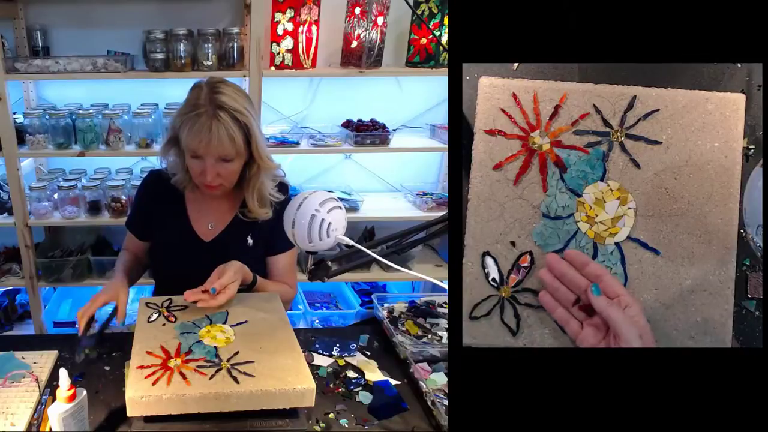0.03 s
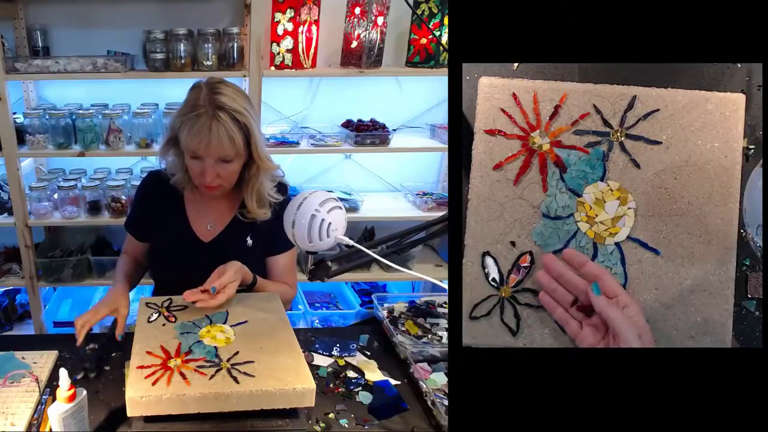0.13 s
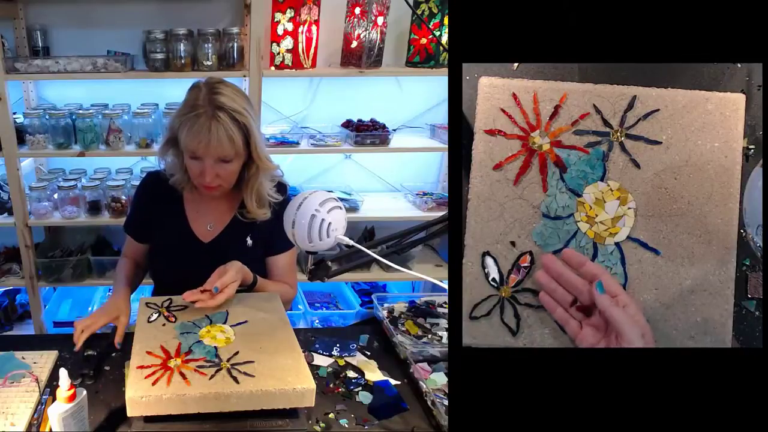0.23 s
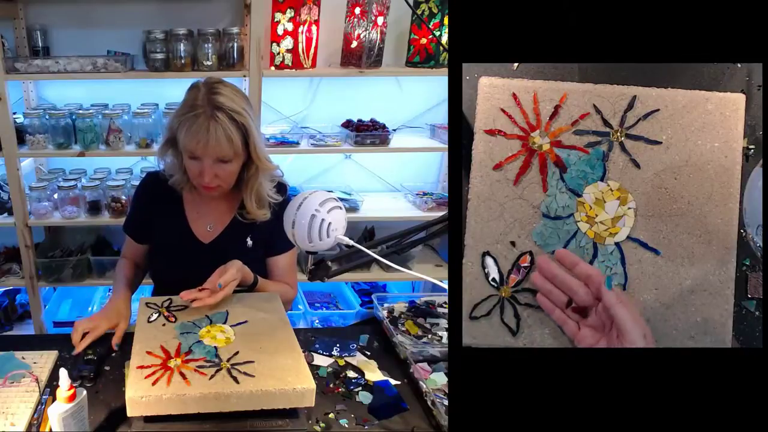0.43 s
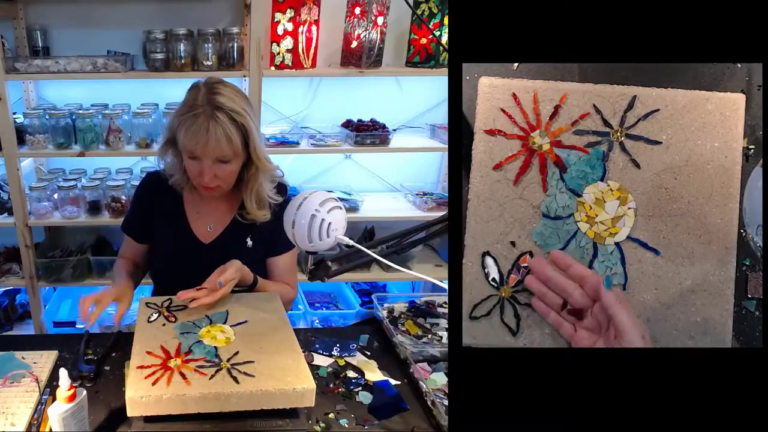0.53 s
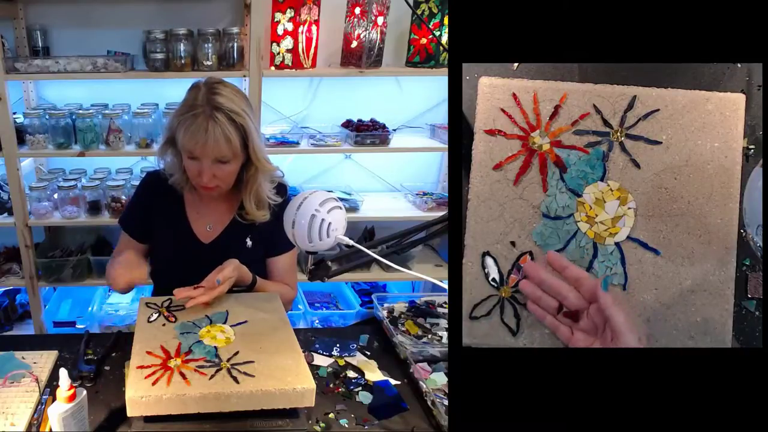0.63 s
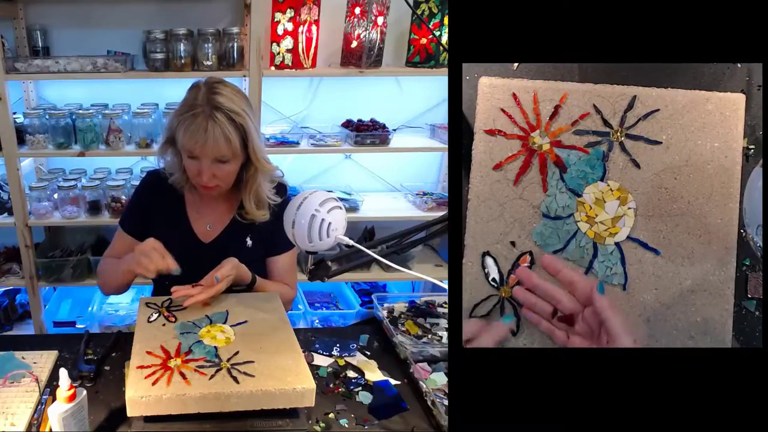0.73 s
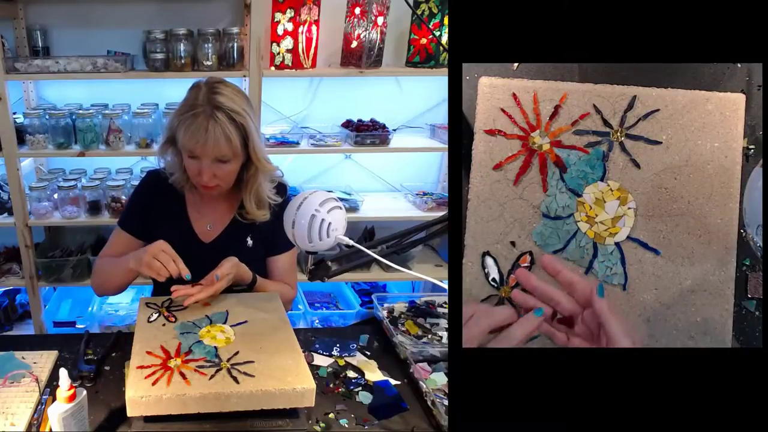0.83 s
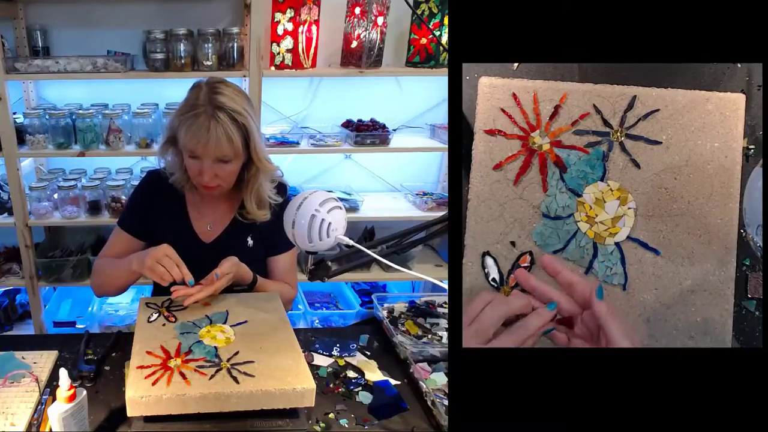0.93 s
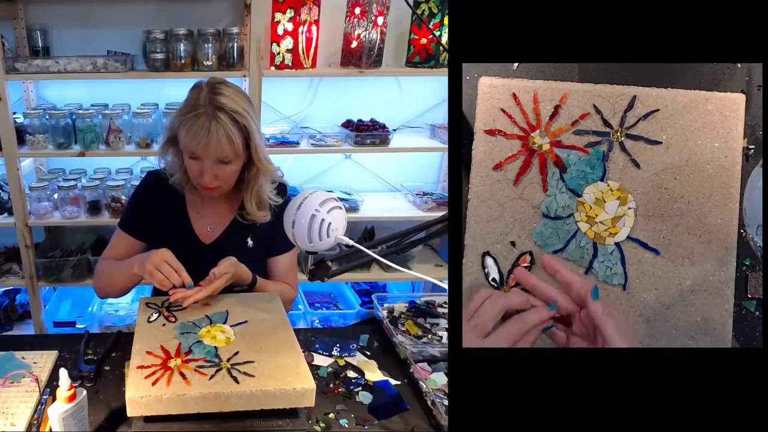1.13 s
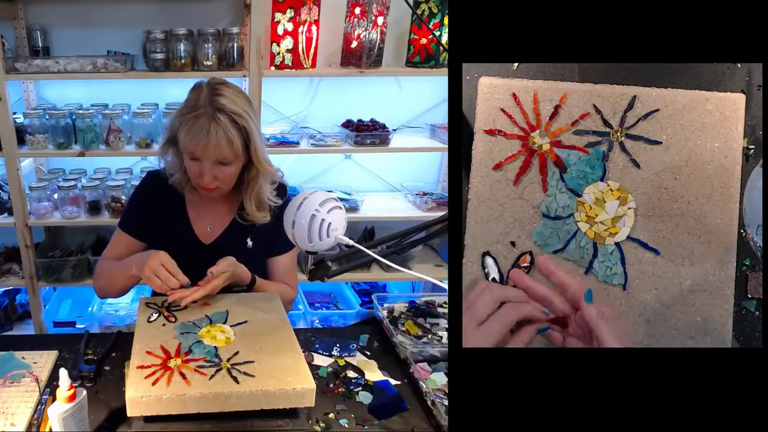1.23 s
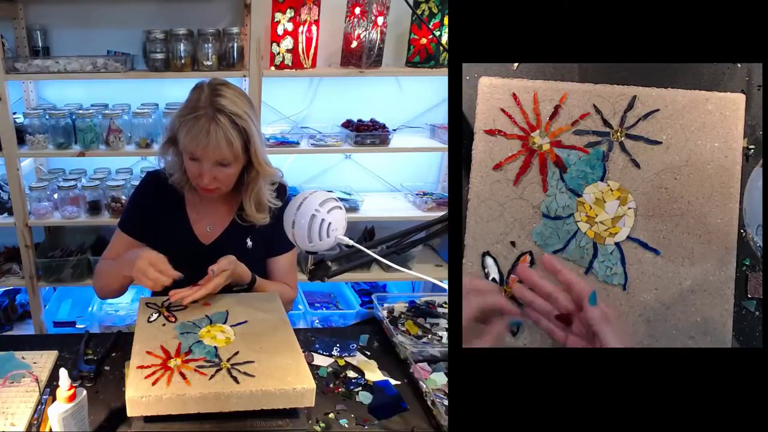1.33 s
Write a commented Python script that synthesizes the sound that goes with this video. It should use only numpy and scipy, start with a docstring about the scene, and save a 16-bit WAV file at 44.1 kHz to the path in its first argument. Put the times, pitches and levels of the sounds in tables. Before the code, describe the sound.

One sharp knock of a small hard tool on a work table, with brief glassy ring.

```python
"""A small hard tool knocks once on a cluttered work table, with a sharp crack and a brief glassy ring.
It first brushes the top with a soft thud and a slide; then its edge lands and strikes the board's modes.
The table sways deeply and loose things shiver with it until a hand stills it.
Fingers rub, small pieces tick and tap faintly, and the knock dies away in the quiet room."""
import sys
import numpy as np
from scipy import signal
from scipy.fft import rfft, irfft, next_fast_len
from scipy.io import wavfile

SR = 44100
rng = np.random.default_rng(int(sys.argv[2]) if len(sys.argv) > 2 else 0)


def inscribe(sig):
    """Save sig as 16-bit PCM at rate SR to the path in sys.argv[1].

    A 1-D sig is mono; a 2-D sig holds one channel per row.
    Samples are clipped to [-1, 1] before scaling.
    """
    pcm = np.round(np.clip(np.atleast_2d(sig).T, -1, 1) * 32767)
    wavfile.write(sys.argv[1], SR, pcm.astype(np.int16))


N = 61739
T = np.arange(N) / SR
CRACK_S, CRACK_RISE_S = 0.3982, 0.0005  # the tool's hard edge lands
TOP_BUILD_S = 0.00093  # a blow takes this long to spread through the board
ECHO_RISE_S = 0.013


def from_db(db):
    """Decibels to gain."""
    return 10 ** (np.asarray(db) / 20)


def rms_one(x):
    """Scale to rms 1."""
    return x / np.sqrt(np.mean(x ** 2) + 1e-20)


def envelope(start, rise, hold, t60):
    """Linear attack, hold counted from the start, exponential release; all in seconds."""
    return np.clip((T - start) / rise, 0, 1) * from_db(-60 * np.maximum(T - start - hold, 0) / t60)


def ring(start, hz, t60):
    """A decaying mode of height 1, struck at start."""
    age = np.maximum(T - start, 0)
    return np.sin(2 * np.pi * hz * age) * from_db(-60 * age / t60)


def noise(colour, skirt_db_per_octave=37.5):
    """Steady noise of the given colour, rolling off steeply outside its range; rms 1."""
    size = next_fast_len(N)
    hz = np.maximum(np.fft.rfftfreq(size, 1 / SR), 1)
    points_hz, points_db = np.transpose(colour)
    octaves_outside = np.abs(np.log2(hz / np.clip(hz, points_hz[0], points_hz[-1])))
    db = np.interp(np.log(hz), np.log(points_hz), points_db) - skirt_db_per_octave * octaves_outside
    return rms_one(irfft(rfft(rng.standard_normal(size)) * from_db(db), size)[:N])


def resonant_noise(hz, width_hz):
    """Pitched noise: two passes through one resonance; rms 1."""
    b, a = signal.iirpeak(hz, hz / (2 * width_hz), fs=SR)
    return rms_one(signal.lfilter(b, a, signal.lfilter(b, a, rng.standard_normal(N))))


def room_tone():
    """A faint, steady bed of dark noise."""
    # room tone colour: (frequency [Hz], relative level [dB])
    colour = [(30, -0.5), (90, -14), (220, -9), (650, -15), (1200, -18.5), (2000, -31.5), (4000, -45.5),
              (14000, -49)]
    return from_db(-72) * noise(colour)


def small_pieces(rise_s=0.0047):
    """Small pieces touch softly, one note each: taps stop short, glass rings on."""
    # faint taps: (time [s], level [dB], pitch [Hz])
    taps = [(1.300, -51, 1222), (1.307, -47.5, 626), (1.328, -53, 649), (1.335, -49.5, 45),
            (1.387, -56, 244)]
    # glass ticks: (time [s], level [dB], pitch [Hz])
    ticks = [(0.735, -79, 2800), (0.868, -69.5, 1963), (0.948, -74.5, 1990), (1.008, -85.5, 4040),
             (1.19, -79.5, 2050)]
    return sum(from_db(db) * envelope(s, rise_s, rise_s, t60) * np.sin(2 * np.pi * hz * (T - s))
               for touches, t60 in [(taps, 0.041), (ticks, 0.22)] for s, db, hz in touches)


def rubs():
    """Fingers and pieces rub the board: soft swells of pitched friction, each with a low bump."""
    # strokes: (peak time [s], length [s], rub level [dB], pitch [Hz], bump level [dB])
    strokes = [(0.028, 0.055, -74, 694, -64), (0.299, 0.039, -61.5, 1263, -47.5),
               (0.382, 0.049, -54, 1273, -37.5), (0.805, 0.045, -56.5, 601, -54.5),
               (0.801, 0.079, -67.5, 1041, -55), (0.874, 0.046, -53, 427, -53),
               (0.883, 0.023, -61.5, 1190, -50.5), (0.931, 0.044, -64, 798, -48),
               (1.056, 0.041, -60, 529, -68), (1.086, 0.028, -57.5, 758, -49),
               (1.149, 0.055, -64, 713, -49.5), (1.217, 0.032, -68, 1298, -66),
               (1.268, 0.04, -64.5, 1121, -76)]
    # broad friction colour: (frequency [Hz], relative level [dB])
    friction_colour = [(330, -14), (440, -2), (610, 6), (780, -4.5), (880, -7.5), (1100, -1.5), (1340, -8),
                       (1420, -15.5), (1650, -27), (1970, -19.5), (2200, -35), (4000, -41)]
    # low bump through the board: (frequency [Hz], relative level [dB])
    bump_colour = [(55, 6.5), (72, 1), (95, -11.5), (160, -10.5), (230, -5), (310, -25)]
    friction = from_db(-4.5) * noise(friction_colour)
    bump = noise(bump_colour)
    rubbing = np.zeros(N)
    for s, length, db, hz, bump_db in strokes:
        swell = np.exp(-2 * ((T - s) / length) ** 2)
        scrape = friction + resonant_noise(hz, width_hz=32)
        rubbing += swell * (from_db(db) * scrape + from_db(bump_db) * bump)
    return rubbing


def room_echo(start_s=0.396):
    """The knock's tail dies away in the room band by band, the treble first."""
    # tail colour: (frequency [Hz], relative level [dB])
    colour = [(80, -12.5), (130, -2), (260, 2.5), (400, -3.5), (600, -2.5), (760, -0.5), (1030, 2),
              (1340, -4.5), (1420, -7), (1600, -15), (2250, -23.5), (2800, -24), (4500, -27), (8000, -37),
              (13000, -48.5)]
    # room decay: (band centre [Hz], t60 [s])
    decays = [(100, 0.63), (260, 0.43), (700, 0.44), (1200, 0.37), (2000, 0.42), (4800, 0.33), (8000, 0.32),
              (13000, 0.089)]
    centres, t60s = np.transpose(decays)
    size = next_fast_len(N)
    diffuse = rfft(noise(colour), size)
    log_hz = np.log(np.fft.rfftfreq(size, 1 / SR) + 1)
    tail = np.zeros(N)
    for one_band, t60 in zip(np.eye(len(t60s)), t60s):
        crossover = np.interp(log_hz, np.log(centres), one_band)
        tail += irfft(diffuse * crossover, size)[:N] * envelope(start_s, ECHO_RISE_S, 0, t60)
    return from_db(-18.5) * tail


def shiver(sway, smoothing_hz=9, follow_db_per_db=0.46):
    """Loose things tremble, rising and falling with the table's sway."""
    # rattle colour: (frequency [Hz], relative level [dB])
    colour = [(60, 16), (100, -0.5), (240, -7.5), (330, -11), (600, -19), (900, -21), (1340, -16.5),
              (1420, -29.5), (1650, -38), (2300, -46), (6000, -61)]
    # resonances of the loose things: (frequency [Hz], nominal width [Hz], relative level [dB])
    loose_modes = [(124.1, 6.7, -1.5), (174.1, 2.7, -10), (236.5, 8, -9.5), (447, 45, -18),
                   (754.5, 26, -16), (1016.5, 23, -16)]
    power = signal.sosfilt(signal.bessel(2, smoothing_hz, fs=SR, output="sos"), sway ** 2)
    drive = np.maximum(2 * power, 0) ** (follow_db_per_db / 2)
    ringing = sum(from_db(db) * resonant_noise(hz, width_hz) for hz, width_hz, db in loose_modes)
    return drive * (from_db(-39.5) * noise(colour) + from_db(-42) * ringing)


def table_sway(hand_s=1.102, damping_db_per_s=98):
    """Each load builds up the table's deep modes, which beat as they die, until a hand stills them."""
    # loads on the table: (time [s], level [dB], build-up [s])
    loads = [(0.195, -1.5, 0.26), (0.414, -1, 0.052)]
    # sway modes: (frequency [Hz], relative level [dB], t60 [s], signed weight)
    modes = [(29.88, 3, 0.58, -1), (33.22, -3.5, 1.467, 1), (37.46, 5, 0.65, 0.39), (42.16, 9, 0.57, 0.47)]
    sway = np.zeros(N)
    for s, db, build_s in loads:
        build_up = 1 - np.exp(-np.maximum(T - s, 0) / build_s)
        for hz, mode_db, t60, weight in modes:
            sway += from_db(db + mode_db) * weight * ring(s, hz, t60) * build_up
    return sway * from_db(-damping_db_per_s * np.maximum(T - hand_s, 0))


def strike_top(s, db, contact_ms):
    """One blow rings the table top; a longer contact is duller."""
    # modes of the board: (frequency [Hz], relative level [dB], t60 [s])
    modes = [(121.8, -24.5, .4), (169, -17.5, 0.083), (224, -13.5, .06), (237.7, -28, 0.3),
             (379.4, -29, 0.33), (496, -20, 0.18), (610, -4.5, 0.032), (873.5, -7.5, 0.047),
             (858, -31, 0.37), (1037, -26.5, 0.18), (1268, -14.5, 0.04), (1190, -31.5, .22),
             (1261, -40, 0.53)]
    body = sum(from_db(db + mode_db) * ring(s, hz, t60) for hz, mode_db, t60 in modes)
    attack = np.clip((T - s) / TOP_BUILD_S, 0, 1)
    force = np.exp(-0.5 * (np.arange(-90, 91) / (contact_ms * SR / 4000)) ** 2)
    return np.convolve(body * attack, force / force.sum(), "same")


def first_touch(start_s=0.1765, slide_cutoff_hz=13100):
    """The tool brushes the top: a padded, uneven thud and a short slide that rings brightly."""
    # dull thud colour: (frequency [Hz], relative level [dB])
    thud_colour = [(70, 3), (130, -10), (250, 5), (370, -5), (520, -1.5), (800, -15), (1200, -22.5),
                   (1700, -38.5), (3600, -55)]
    # hiss of the slide: (frequency [Hz], relative level [dB])
    slide_colour = [(3000, -23), (5500, -9), (6100, -14), (6900, 2.5), (9000, -3.5), (11700, -5.5)]
    # resonances of the slide: (frequency [Hz], relative level [dB])
    slide_modes = [(7500, -1.5), (8030, 0), (9450, -4.5), (10300, -8.5), (11250, -5.5), (12750, -7)]
    # bumps as the tool meets the top: (time [s], level [dB])
    bumps = [(0.178, -29), (0.1985, -21.5), (0.2465, -18), (0.268, -26.5)]
    thud = from_db(-34) * noise(thud_colour) * envelope(start_s, rise=0.0091, hold=0.08, t60=0.3)
    ringing = sum(from_db(db) * resonant_noise(hz, width_hz=260) for hz, db in slide_modes)
    lowpass = signal.butter(16, slide_cutoff_hz, fs=SR, output="sos")
    hiss = signal.sosfilt(lowpass, noise(slide_colour) + from_db(-4.5) * ringing)
    slide = from_db(-58) * hiss * envelope(start_s, rise=0.0092, hold=0.039, t60=0.24)
    return thud + slide + sum(strike_top(s, db, contact_ms=1) for s, db in bumps)


def tool_ring(decay_stretch=2.6):
    """The tool's modes sound clean and glassy at first, then shimmer on as the room returns them."""
    # modes of the tool: (frequency [Hz], level [dB], t60 [s])
    modes = [(2790, -49.5, 0.34), (4164, -43, 0.14), (4870, -49.5, 0.14), (5970, -53, 0.17),
             (7270, -42.5, .1), (9460, -39, 0.07), (10370, -47, .07), (11920, -49, .1), (13130, -48, .07),
             (14140, -58.5, .09)]
    attack = np.clip((T - CRACK_S) / CRACK_RISE_S, 0, 1)
    direct = attack * sum(from_db(db) * ring(CRACK_S, hz, t60) for hz, db, t60 in modes)
    shimmer = sum(from_db(db) * resonant_noise(hz, width_hz=100)
                  * envelope(CRACK_S, ECHO_RISE_S, 0, decay_stretch * t60) for hz, db, t60 in modes)
    return direct + from_db(-16.5) * shimmer


def knock(crunch_s=0.3939, rebound_s=0.408):
    """The tool hits the board: grit crunches, then the hard edge snaps and snaps again on the rebound."""
    # quick contacts: (time [s], level [dB], contact time [ms])
    contacts = [(0.3947, 2, 0.23), (0.4025, -17, 0.22)]
    # crushed grit colour: (frequency [Hz], relative level [dB])
    grit_colour = [(1300, 6.5), (1900, -9.5), (2300, -9.5), (4500, -14.5), (7000, -25), (12000, -34.5)]
    # bright crack of the edge: (frequency [Hz], relative level [dB])
    crack_colour = [(1500, 16), (2500, 1.5), (4400, 5.5), (6400, -5), (7800, 7), (11000, -16.5),
                    (14000, -15.5)]
    body = sum(strike_top(s, db, contact_ms) for s, db, contact_ms in contacts)
    crunch = from_db(-38.5) * noise(grit_colour) * envelope(crunch_s, TOP_BUILD_S, hold=0, t60=0.07)
    snaps = sum(from_db(db) * envelope(s, CRACK_RISE_S, hold=0, t60=0.018)
                for s, db in [(CRACK_S, -33), (rebound_s, -41.5)])
    tail = from_db(-46.5) * envelope(CRACK_S, CRACK_RISE_S, hold=0, t60=0.11)
    return body + crunch + (snaps + tail) * noise(crack_colour)


def scene():
    """The tool and everything it stirs on the table, in mono over the quiet room."""
    sway = table_sway()
    handling = rubs() + small_pieces()
    tool = first_touch() + knock() + tool_ring()
    return (tool + room_echo() + sway + shiver(sway) + handling + room_tone())[None]


def record(dry):
    """A soft clip rounds the highest peaks and a steep low-pass trims the top."""
    ceiling, cutoff_hz = 0.97, 14700
    rounded = dry / (1 + (dry / ceiling) ** 12) ** (1 / 12)
    return signal.sosfilt(signal.cheby2(16, 50, cutoff_hz, fs=SR, output="sos"), rounded)


dry = scene()
out = record(dry)
inscribe(out)
```